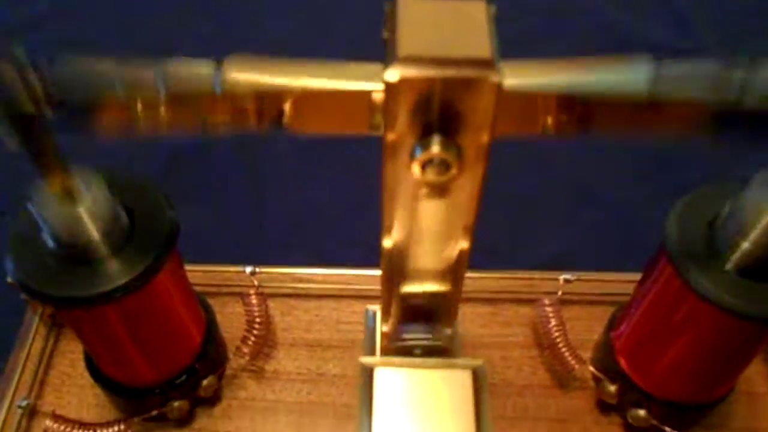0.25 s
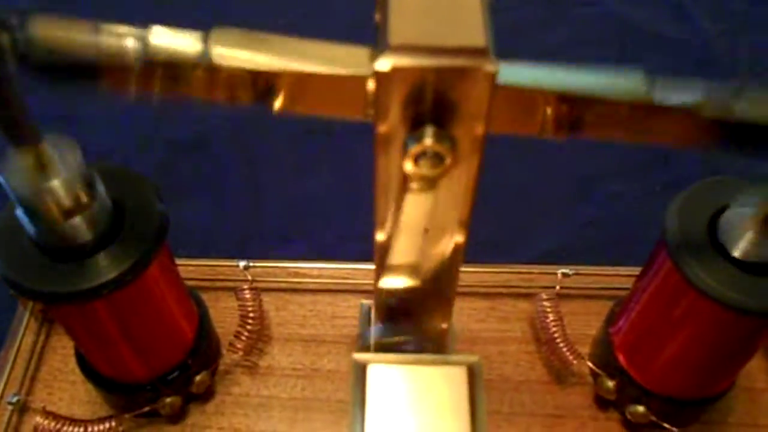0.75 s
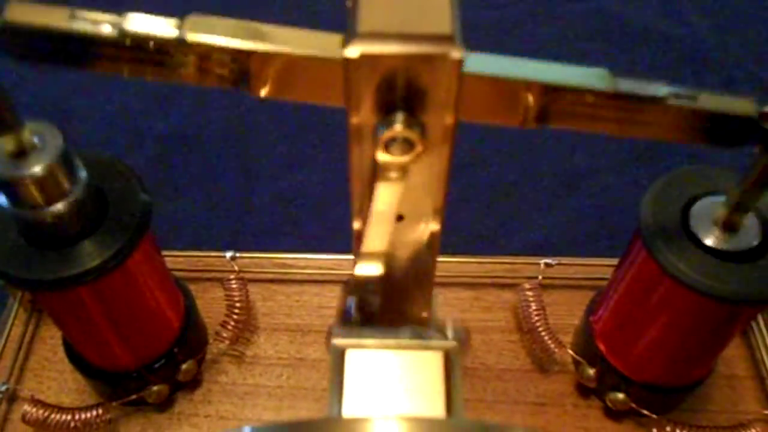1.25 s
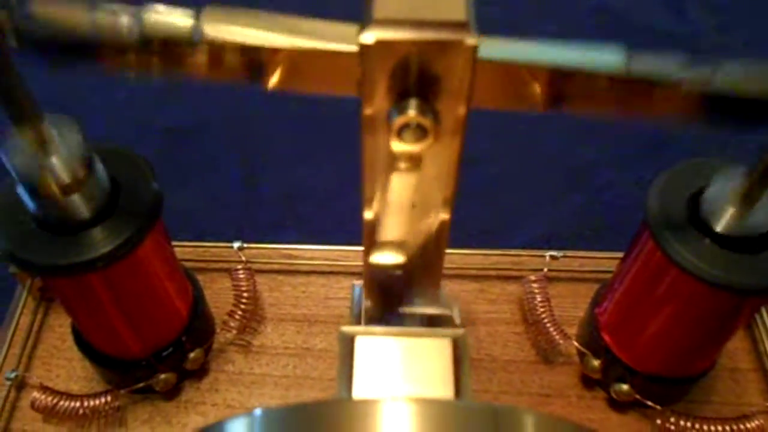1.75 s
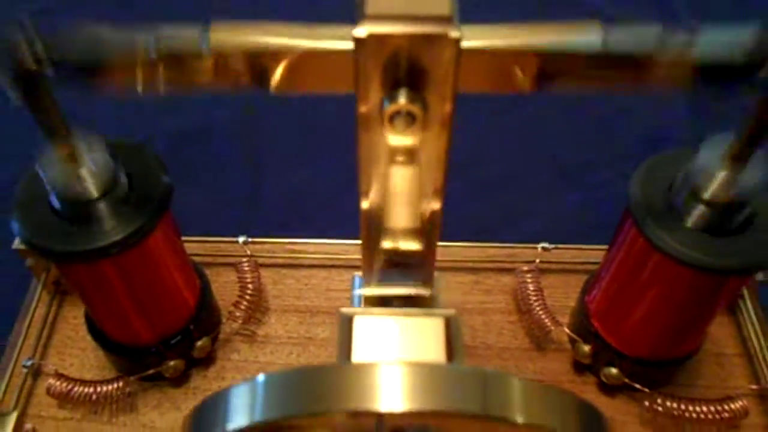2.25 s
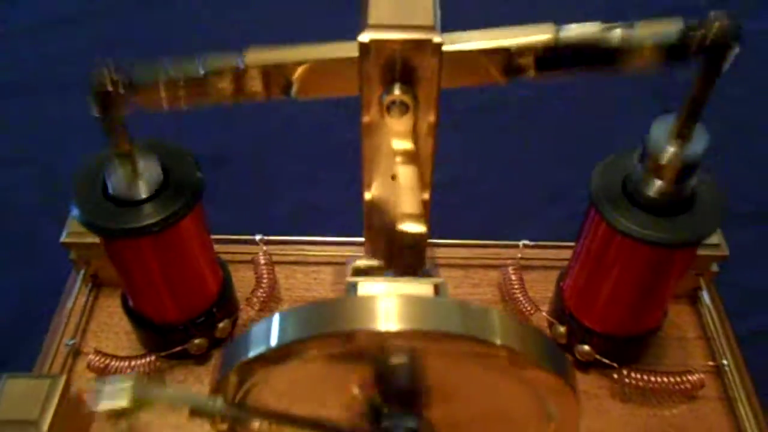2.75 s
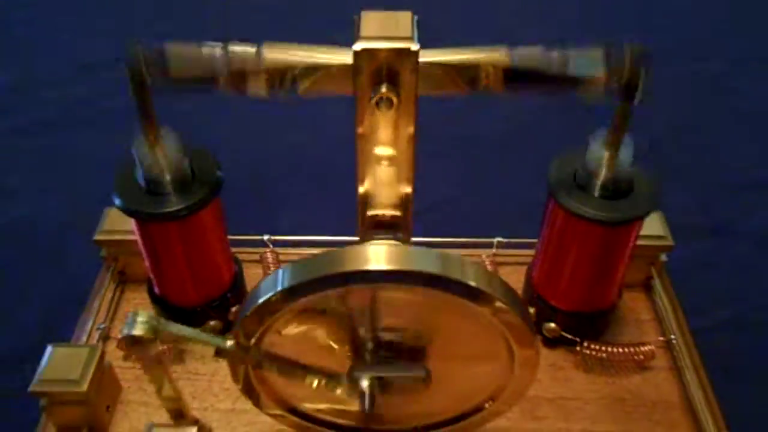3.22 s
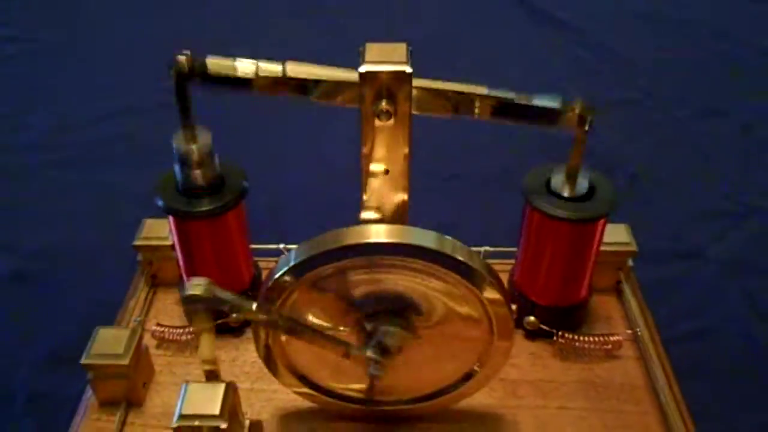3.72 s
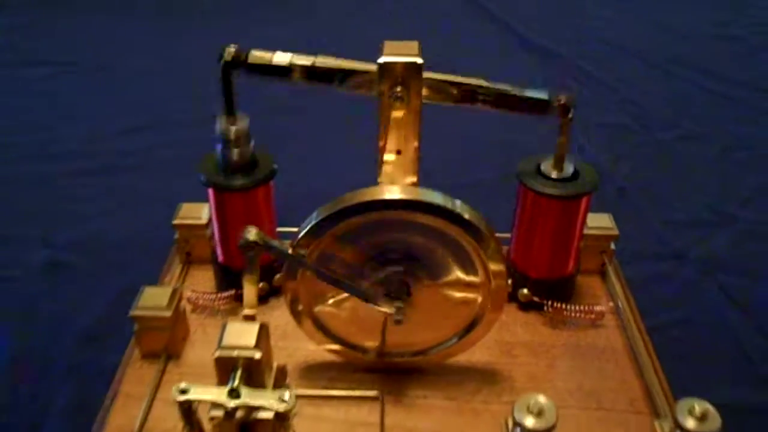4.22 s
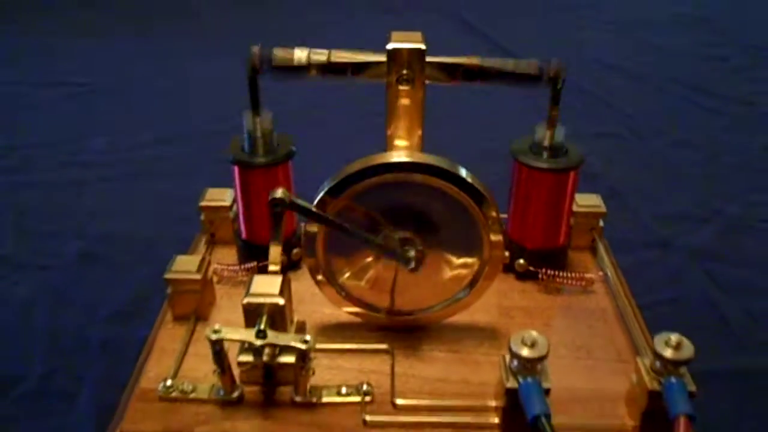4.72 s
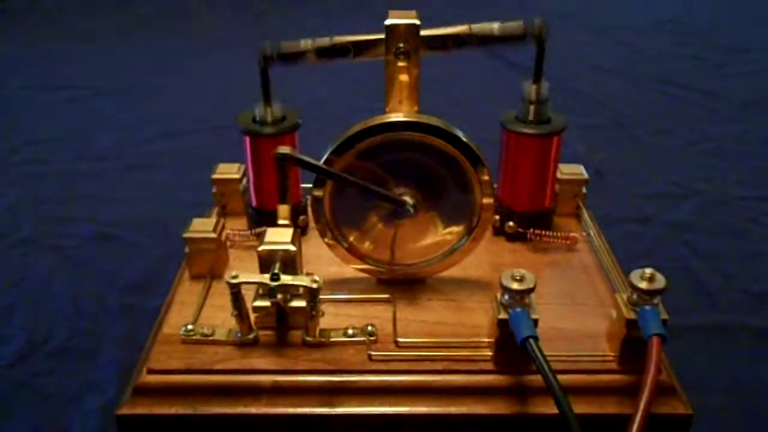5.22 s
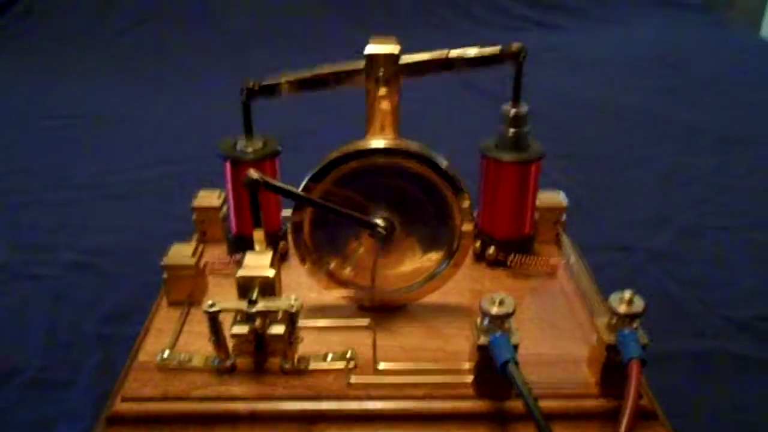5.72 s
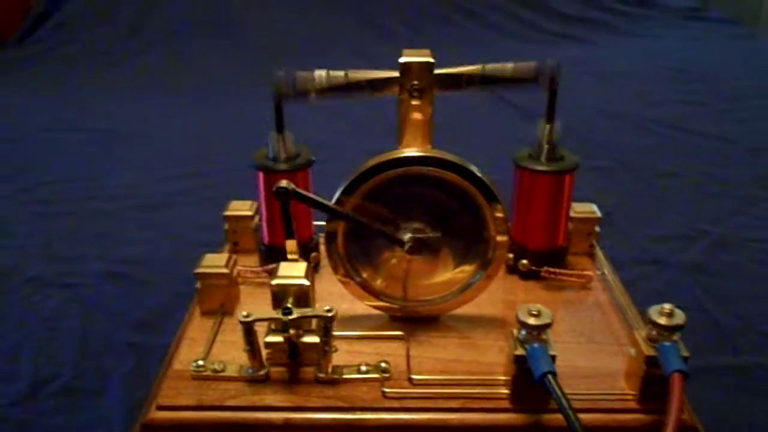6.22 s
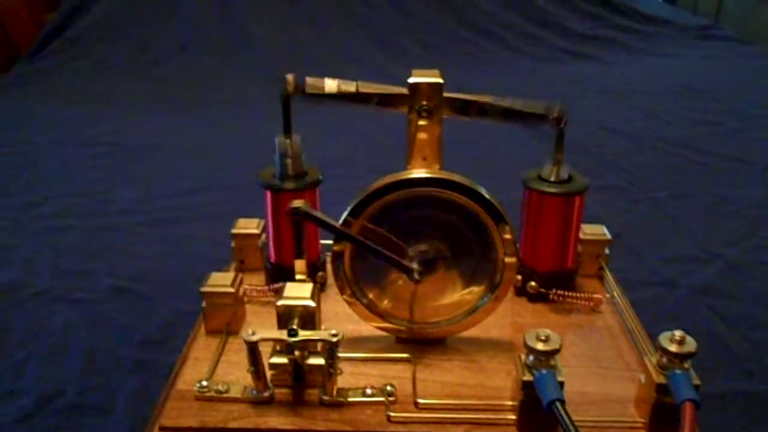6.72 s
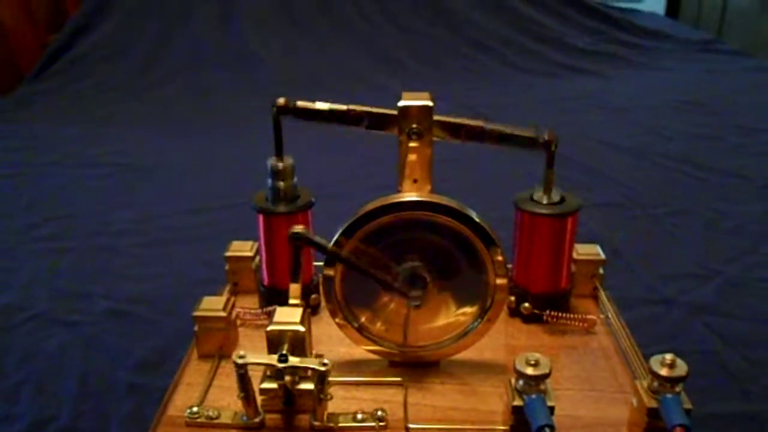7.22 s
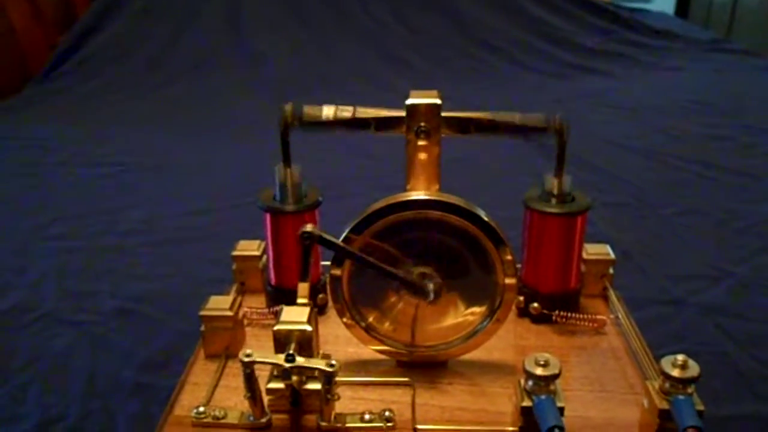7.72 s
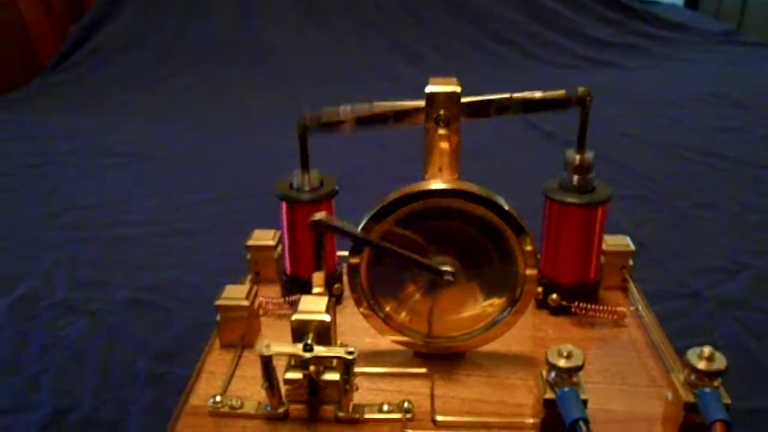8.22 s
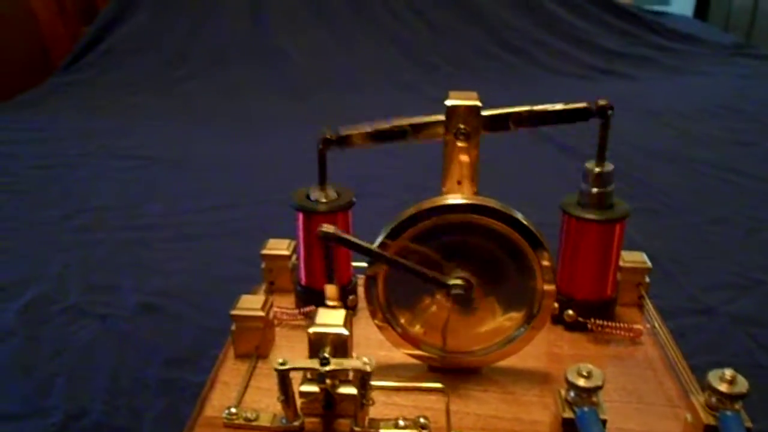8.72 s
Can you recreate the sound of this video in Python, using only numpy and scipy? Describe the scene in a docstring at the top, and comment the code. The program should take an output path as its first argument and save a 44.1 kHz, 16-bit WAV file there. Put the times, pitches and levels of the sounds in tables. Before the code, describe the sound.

Rapid steady metal clatter of a tabletop beam engine on a wooden base, dry knocks and bright contact snaps, gradually heard from farther away.

```python
"""Small, soft room: a brass beam engine with two solenoids clatters at nearly six turns a second on a wooden base.
Each turn has two plunger knocks, a pin tick and two contact snaps: noise bursts with rebounds, filtered by colour.
Between them friction noise scrapes, catches ring resonances, and decaying modes add the brass.
The microphone backs away; two dull thumps, one with a rebound, sound early on wood.
Soft dull swells and short hollow bumps are resonant noise; air noise and a faint mains hum lie beneath."""
import sys
import numpy as np
from scipy import signal
from scipy.fft import rfft, irfft
from scipy.io import wavfile
from scipy.ndimage import uniform_filter1d

SR = 44100
rng = np.random.default_rng(int(sys.argv[2]) if len(sys.argv) > 2 else 0)


def to_wav(sig):
    """Store sig (one row per channel, or 1-D mono) as 16-bit WAV at the path in sys.argv[1].

    Samples outside -1..1 are clipped; the rate is SR.
    """
    pcm = np.clip(np.atleast_2d(sig), -1, 1) * 32767
    pcm = np.round(pcm).astype(np.int16)
    wavfile.write(sys.argv[1], SR, pcm.T)  # frames by channels


N = 394694
TIME = np.arange(N) / SR
SIZE, LEAD = 4096, 256  # length of a blow and its part before the impact, samples
AGE = (np.arange(SIZE) - LEAD) / SR  # time since impact, s
BINS = np.fft.rfftfreq(SIZE, 1 / SR)  # Hz
ONSET_S = .00016  # rise of a hard contact
EDGE_HZ = 12500

# Flywheel slowly losing speed. Each row: time in seconds, length of one turn in seconds.
PERIOD = [(1.7, .1745), (2.8, .17514), (6, .1765), (8.9, .17744)]
# Microphone backing away. Each row: time in seconds, distance from 0 near to 1 far.
DISTANCE = [(0, 0.06), (1.8, 0.0088), (3, 0.26), (4, 0.54), (5, 0.73), (8.9, 0.76)]
# Plunger blows before each blow's own gain. Each row: time in seconds, level in dB.
PLUNGER_DB = [(0, -26.5), (2, -25.5), (5, -28), (8.9, -27.5)]
# Contact snaps before each snap's own gain. Each row: time in seconds, level in dB.
CONTACT_DB = [(0, -28.5), (1.9, -26.5), (2.9, -25), (3.6, -25), (4.198, -27.5), (8.902, -27.5)]
# Plunger friction through one turn. Each row: share of the turn, level in dB.
FRICTION = [(0, -37.5), (.1, -65), (.14, -38.5), (.19, -49.5), (.23, -38.5), (.34, -41), (.44, -40.5),
            (.55, -48.5), (.7, -60), (.735, -45), (.86, -43.5), (.95, -45), (.985, -48), (1, -49)]
# Plunger ring climbing as it slides into its bore. Each row: share of the turn, pitch in Hz.
BORE = [(.14, 3100), (.22, 3620), (.36, 6300), (.45, 7100), (.73, 3900), (.87, 4840)]


def amp(db):
    """Decibels to gain."""
    return 10 ** (np.asarray(db) / 20)


def unit(x):
    """Scales to an rms of one."""
    return x / np.sqrt(np.mean(x ** 2) + 1e-20)


def blow(x, db):
    """Scales a blow so that its energy, spread over 10 ms, has the level db."""
    return amp(db) * x / np.sqrt(np.sum(x ** 2) / (.01 * SR) + 1e-20)


def curve(rows, at):
    """Joins (x, value) rows by straight lines."""
    return np.interp(at, *np.transpose(rows))


def read(rows, hz, order=1):
    """Reads one column of a spectrum on a log-frequency axis."""
    rows = np.asarray(rows, float)
    return np.interp(np.log(hz + 1), np.log(rows[:, 0] + 1), rows[:, order])


def add(mix, s, sound):
    """Mixes in a blow that lands at time s."""
    start = round(s * SR) - LEAD
    sound = sound[max(-start, 0):]
    part = mix[max(start, 0):][:len(sound)]
    part += sound[:len(part)]


def causal(db):
    """Minimum-phase response for a gain in dB on BINS."""
    log_gain = np.log(amp(np.r_[db, db[-2:0:-1]]))
    return np.exp(np.conj(signal.hilbert(log_gain)))[:len(db)]


def colour(x, db):
    """Filters x by a gain in dB on BINS."""
    return signal.oaconvolve(x, irfft(causal(db)))[:len(x)]


def resonate(x, hz, width_hz):
    """Fixed or moving resonance of gain one: shift to zero pitch, smooth, shift back."""
    turn = np.exp(2j * np.pi * np.cumsum(hz * np.ones(len(x))) / SR)
    r = np.exp(-np.pi * width_hz / SR)
    smooth = signal.lfilter([1 - r], [1, -r], x / turn + 1e-18)
    return 2 * (turn * smooth).real


def resonate_twice(x, hz, width_hz):
    """Two equal resonances in series, for steeper skirts."""
    return resonate(resonate(x, hz, width_hz), hz, width_hz)


def ring(x, modes):
    """Passes x through decaying modes, each with its gain at the peak."""
    t = np.arange(SR // 2) / SR
    body = np.zeros(len(t))
    for hz, db, t60_s in modes:
        peak_gain_one = 2 * np.log(1000) / (t60_s * SR)
        body += peak_gain_one * amp(db - 60 * t / t60_s) * np.sin(2 * np.pi * hz * t)
    return signal.oaconvolve(x, body)[:len(x)]


def swell(t, rise_s, decay_s):
    """Exponential rise up to t = 0, exponential fall after it."""
    return np.exp(np.minimum(t, 0) / rise_s - np.maximum(t, 0) / decay_s)


def turns(first_s=-.066, slip_at_s=4.6, slip_s=.0129):
    """Start times of the flywheel's turns, one period apart; once the beat slips and stays late."""
    starts = [first_s]
    while starts[-1] < N / SR:
        starts.append(starts[-1] + curve(PERIOD, starts[-1]))
    starts = np.array(starts)
    return starts + slip_s * (starts > slip_at_s)


def crank():
    """The share of its turn that the flywheel has reached at each moment."""
    starts = turns()
    return np.interp(TIME, starts, np.arange(len(starts))) % 1


# share: place in the turn; lag: added share once the wheel has slowed;
# alike: likeness to the turn before, 0-1; solid: share of clean push, 0-1
def stroke(spectrum, level, share, lag, rise_s, decay_s, bounce_s, bounce_db, tail_db, tail_s,
           alike, gain_db, scatter_db, far_db=0, solid=0, accents=(),
           pitch_scatter_oct=.025, ripple_db=2.3, solid_hz=3000, snap_hz=6700, brighten=.94):
    """One impact a turn: a burst of micro-contacts and a rebound, akin from turn to turn."""
    out, grain = np.zeros(N), rng.standard_normal(SIZE)
    for start in turns()[:-1]:
        period = curve(PERIOD, start)
        slowed = (period - PERIOD[0][1]) / (PERIOD[-1][1] - PERIOD[0][1])
        s = start + (share + lag * slowed) * period
        grain = alike * grain + np.sqrt(1 - alike ** 2) * rng.standard_normal(SIZE)
        late, strong, long, chance, pitch = rng.standard_normal(5)

        rebound_gain = amp(min(bounce_db + 10 * strong, 0))  # never above the blow
        rebound = rebound_gain * swell(AGE - bounce_s * (1 + .19 * late), rise_s, decay_s)
        accent_db = sum(db for at, db in accents if abs(at - s) < period / 2)
        force_db = accent_db or scatter_db * np.tanh(chance)
        force = amp(force_db)
        # a harder blow is over sooner and stands further above its rebound
        main = force * swell(AGE * force, rise_s, decay_s * np.exp(.062 * long))
        burst = rfft(grain * (main + rebound + amp(tail_db) * swell(AGE, rise_s, tail_s)))
        # a brief contact drives all pitches evenly
        burst *= causal(-10 * np.log10(uniform_filter1d(abs(burst) ** 2, size=60)))

        far = curve(DISTANCE, s)
        clean = solid * (1 - far / 3) / (1 + (BINS / solid_hz) ** 6)
        push = rfft(signal.unit_impulse(SIZE, LEAD))
        burst = clean * push + np.sqrt(1 - clean ** 2) * burst

        hz = BINS * 2 ** (pitch_scatter_oct * pitch)  # no two blows land on quite the same spot
        tone_db = (1 - far) * read(spectrum, hz) + far * read(spectrum, hz, order=2)
        # a harder blow gains less in the bass: full effect half an octave below snap_hz
        tone_db += brighten * force_db * np.clip(2 * np.log2((BINS + 1) / snap_hz), -1, 0)
        ripple = np.r_[0, rng.standard_normal(size=12)]
        tone_db += ripple_db * np.interp(BINS, np.linspace(solid_hz, EDGE_HZ, num=13), ripple)
        level_db = curve(level, s) + force_db + gain_db + far * far_db
        add(out, s, blow(irfft(burst * causal(tone_db)), level_db))
    return out


def knock():
    """The plungers reverse: a dry, mostly solid knock."""
    # Each row: pitch in Hz, dB near, dB far.
    knock_tone = [(750, -44, -34), (1120, -10.5, -16), (1540, -23, -58), (1988, -4, 1.5), (2350, -6, -3),
                  (2580, -25, -11.5), (3970, -18, -4), (4630, -29, -1), (5900, -5.5, -11),
                  (9400, -21, -6.5), (11300, -55, -45)]
    return stroke(knock_tone, PLUNGER_DB, share=.003, lag=0, rise_s=ONSET_S, decay_s=.00096,
                  bounce_s=.00194, bounce_db=-16, tail_db=-23, tail_s=.011,
                  alike=.85, gain_db=-1.26, scatter_db=.5, solid=.96)


def clack():
    """The plungers reverse again, with a longer contact."""
    # Each row: pitch in Hz, dB near, dB far.
    clack_tone = [(684, -33, -46), (1290, -18, -32), (1530, -20, -29.5), (2270, -1, -3), (3370, -39, -13),
                  (3930, -21, -1), (5430, -16, -11), (6100, -3, -2), (7770, -14, -6), (10140, -12.5, -11.5),
                  (12750, -48, -34)]
    return stroke(clack_tone, PLUNGER_DB, share=.452, lag=.0037, rise_s=.0002, decay_s=.0031,
                  bounce_s=.0079, bounce_db=-37, tail_db=-23, tail_s=.021,
                  alike=.64, gain_db=0, scatter_db=0, far_db=-.9, solid=.81)


def tick():
    """A pin takes up its play in a very short contact."""
    # Each row: pitch in Hz, dB near, dB far.
    tick_tone = [(755, -23.5, -6), (1310, -13, -9), (2480, -20, -15), (3040, -1.5, 13.5), (3350, -58, -21),
                 (4240, -12, -2), (4700, -30, -48), (6400, -2.5, -2), (8150, -24, -11), (10360, -7.5, -3),
                 (11100, -45, -62)]
    return stroke(tick_tone, PLUNGER_DB, share=.12, lag=.00048, rise_s=.00017, decay_s=.00046,
                  bounce_s=.0019, bounce_db=-27, tail_db=-19, tail_s=.007,
                  alike=.73, gain_db=-9, scatter_db=1, far_db=-3.5)


def contact_make():
    """The contact closes and bounces strongly at once."""
    # Each row: pitch in Hz, dB near, dB far.
    make_tone = [(398, -15, -8), (850, -33, -19), (1470, 7, -1.5), (1853, -33, -53), (1886, 9.5, 5.5),
                 (3770, -37, -12), (4910, 5, 12.5), (5130, -1, -17), (7300, -5, -10), (8440, 5, 10),
                 (10060, 4, 7), (12640, -30, -26)]
    return stroke(make_tone, CONTACT_DB, share=.321, lag=.0044, rise_s=.00075, decay_s=.00062,
                  bounce_s=.0011, bounce_db=-6, tail_db=-10, tail_s=.0019,
                  alike=.43, gain_db=-1.47, scatter_db=1, far_db=-.7)


def contact_break():
    """The contact snaps open with a sharp onset, now and then extra hard."""
    # Each row: pitch in Hz, dB near, dB far.
    break_tone = [(676, -22, -29), (1260, -31, 5), (1600, -14, -14), (1840, 2.5, -5), (2760, -6, 0),
                  (5150, 2, 7), (5150, 6, -18), (6230, 11, 5.5), (8250, 1, 4), (8350, 10, 11.5),
                  (10150, 7.5, 7.5), (13200, -48, -13)]
    # Each row: time in seconds, dB above the usual.
    hard_snaps = [(.26, 9), (.959, 2), (1.134, 2.5), (2.881, 3), (3.757, 2), (6.588, 4.5), (7.65, 2.5)]
    return stroke(break_tone, CONTACT_DB, share=.871, lag=.0066, rise_s=.000089, decay_s=.0021,
                  bounce_s=.00248, bounce_db=-4, tail_db=-24, tail_s=.014,
                  alike=.51, gain_db=.2, scatter_db=.5, far_db=1, accents=hard_snaps)


def chatter(hz=9300, width_hz=1100, level_db=-34.5, length_s=.011, gap_s=.00096):
    """After each knock a light part buzzes against its seat in quick, bright bounces."""
    out = np.zeros(N)
    for s in turns()[:-1]:
        times = np.linspace(2 * gap_s, length_s, num=8) + gap_s * rng.uniform(-.88, .78, size=8)
        bounces = sum(swell(AGE - at, .00013, .0001) * np.exp(-at / length_s) for at in times)
        buzz = bounces * rng.standard_normal(SIZE)
        add(out, s, blow(resonate_twice(buzz, hz, width_hz), level_db))
    return out


def plungers(rough=.24, worn=.25, whistle_db=-9, width_hz=470):
    """The plungers scrape over the same high spots each turn; a faint resonance climbs with the stroke."""
    # Each row: pitch in Hz, dB near, dB far.
    slide_tone = [(420, -8.5, -13.5), (816, -12, -31.5), (1377, 1.5, -16), (1830, 2.5, 1), (1930, -4.5, 5),
                  (3170, -2, -4), (3480, -3, 3), (4120, -5.5, 7), (5540, 4.5, -14), (6600, -15, -6),
                  (9000, -4, -17), (11400, -37, -45)]
    share = crank()
    spots = np.interp(share, np.linspace(0, 1, num=150), rng.standard_normal(size=150))
    stray_grit = unit(uniform_filter1d(rng.standard_normal(N), size=130))
    grit = np.exp(worn * spots + rough * stray_grit)
    rub = unit(grit * rng.standard_normal(N)) * amp(curve(FRICTION, share))
    far = curve(DISTANCE, TIME)
    near_scrape = colour(rub, read(slide_tone, BINS))
    far_scrape = colour(rub, read(slide_tone, BINS, order=2))
    scrape = (1 - far) * near_scrape + far * far_scrape
    whistle = unit(resonate_twice(rub, curve(BORE, share), width_hz)) * (1 - .21 * far)
    return rub.std() * (unit(scrape) + amp(whistle_db) * whistle)


def catches(jitter_s=.0009, scatter_db=3, decay_s=.00097, far_db=-2, rod_hz=2800, rod_db=-2,
            stray_db=-2.5, scatter_oct=.13, width_hz=700):
    """The plungers tick over fixed high spots and stray grit; each tick rings the rod and the bore."""
    # Each row: share of the turn, level in dB before scatter and distance.
    high_spots = [(.246, -43.5), (.303, -40), (.365, -45), (.39, -42), (.42, -61), (.488, -42), (.737, -61)]
    out, age = np.zeros(N), AGE[AGE < .01]
    for start in turns()[:-1]:
        strays = [(share, curve(FRICTION, share) + stray_db) for share in rng.random(size=4) / 2]
        for share, db in list(high_spots) + strays:
            late, strong, rod, bore = rng.standard_normal(size=4)
            s = start + share * curve(PERIOD, start) + jitter_s * late
            burst = rng.standard_normal(len(age)) * swell(age, ONSET_S, decay_s)
            rod_ring = resonate_twice(burst, rod_hz * 2 ** (scatter_oct * rod), width_hz)
            bore_hz = curve(BORE, share) * 2 ** (scatter_oct * bore)
            bore_ring = resonate_twice(burst, bore_hz, width_hz)
            level_db = db + scatter_db * strong + far_db * curve(DISTANCE, s)
            add(out, s, blow(amp(rod_db) * rod_ring + bore_ring, level_db))
    return out


def rattles(width_hz=900, stray_db=-45):
    """Resonant noise clinks of a loose link: a few clear ones and many faint strays."""
    # Each row: time in seconds, level in dB, pitch in Hz.
    clear_clinks = [(0.4345, -31, 4900), (0.4354, -34, 3820), (1.188, -37.5, 3520), (1.882, -38, 3750),
                    (2.762, -40, 3570), (2.933, -39, 3580), (3.277, -39, 3640), (3.451, -29, 3600),
                    (4.851, -33.5, 3720), (5.768, -35, 3500), (5.911, -33, 4070), (6.293, -34.5, 3640),
                    (7.15, -38, 4070)]
    out = np.zeros(N)
    strays = [(when * N / SR, stray_db + 3 * rng.normal(), 3000 * 1.5 ** pitch)
              for when, pitch in rng.random(size=(45, 2))]
    for s, db, hz in list(clear_clinks) + strays:
        burst = rng.standard_normal(SIZE) * swell(AGE, .0002, .0016)
        add(out, s, blow(resonate_twice(burst, hz, width_hz), db))
    return out


def brass(blows, scrape, struck_db=-4, scraped_db=13):
    """Blows ring beam, column and flywheel lightly; the scraping feeds their modes as long as it lasts."""
    # Each row: pitch in Hz, gain in dB, t60 in seconds.
    brass_modes = [(1013, -11.5, .1), (1373, -6, .07), (1412, -7, .07), (1770, -9, .06), (2003, -4, .07),
                   (2743, -2, .05), (2950, -4, .04), (4760, -7, .03)]
    return ring(amp(struck_db) * blows + amp(scraped_db) * scrape, brass_modes)


def passing(x, at_s=4.2, approach_s=2.0, leave_s=.48):
    """The engine's colour shifts as the microphone draws back over the flywheel."""
    # Each row: pitch in Hz, gain in dB.
    over_wheel = [(2000, 0.5), (2850, 4.5), (4500, -.5), (7000, -5), (10500, 2.5)]
    near = swell(TIME - at_s, approach_s, leave_s)
    return (1 - near) * x + near * colour(x, read(over_wheel, BINS))


def whir(level_db=-57, far_db=1):
    """The spinning shaft keeps up a fine whir: steady coloured noise."""
    # Each row: pitch in Hz, level in dB.
    whir_tone = [(1500, -10), (2800, -1.5), (3250, 0.5), (4300, -21), (5500, -4), (7000, -9), (11000, -25)]
    noise = unit(colour(rng.standard_normal(N), read(whir_tone, BINS)))
    return amp(level_db + far_db * curve(DISTANCE, TIME)) * noise


def clunks(decay_s=.0014, soft_db=-48, scatter_db=4.5, far_db=-7, from_share=.67):
    """The crank drops through its play with short, woody clunks; two soft ones come late in every turn."""
    # Each row: time in seconds, level in dB.
    clear_clunks = [(.587, -36.5), (1.14, -37.5), (1.28, -37.5), (1.481, -47), (1.991, -38), (2.174, -40),
                    (2.349, -39.5)]
    # Each row: pitch in Hz, gain in dB, t60 in seconds.
    clunk_modes = [(888, 5, 0.057), (1088, -3, 0.026), (1270, -17, 0.046), (1637, -4.5, 0.023)]
    out, starts = np.zeros(N), np.repeat(turns()[:-1], 2)
    times = starts + curve(PERIOD, starts) * rng.uniform(from_share, 1, len(starts))
    scatter = scatter_db * rng.standard_normal(len(times))
    levels = soft_db + scatter + far_db * curve(DISTANCE, times)
    for s, db in list(clear_clunks) + list(zip(times, levels)):
        push = np.gradient(rng.standard_normal(SIZE) * swell(AGE, ONSET_S, decay_s))
        add(out, s, blow(ring(push, clunk_modes), db))
    return out


def thumps(tail_db=-15, tail_s=.092, wood_db=1, peak_s=.00485):
    """Soft, heavy blows on wood: a rough thud, and a clean push that leaves the boxy modes ringing."""
    # The last is a rebound. Each row: time in seconds, level in dB, muffled above Hz, decay in seconds.
    heavy_blows = [(0.145, -23, 1990, 0.008), (0.216, -26, 1110, 0.011), (0.231, -29, 653, 0.029)]
    # Each row: pitch in Hz, gain in dB, t60 in seconds.
    wood_modes = [(224, 7, .24), (290, 4, .2), (457, 7, .12), (523, 4, .12), (595, 4, .15), (636, 1, .1),
                  (708, 2, .16), (833, -1, .12), (1013, 9, .18), (1070, 3, .14)]
    # Each row: pitch in Hz, level in dB.
    thud_tone = [(150, -19), (230, -5), (600, -2), (1100, 0), (1400, 0), (3000, -8), (8000, -13)]
    out, t = np.zeros(N), (np.arange(SR // 2) - LEAD) / SR - peak_s
    for s, db, muffle_hz, decay_s in heavy_blows:
        treble_loss = (BINS / muffle_hz) ** 4
        bass_loss = muffle_hz / 5 / (BINS + 1) + (190 / (BINS + 1)) ** 6
        soft_db = -10 * np.log10(1 + treble_loss + bass_loss)
        shape = swell(t, .0073, decay_s) + amp(tail_db) * swell(t, .002, tail_s)
        crush = rng.standard_normal(len(t)) * shape
        thud = colour(crush, read(thud_tone, BINS) + soft_db)
        wood = ring(colour(swell(t, ONSET_S / 2, ONSET_S / 2), soft_db), wood_modes)
        add(out, s, blow(thud, db) + blow(wood, db + wood_db))
    return out


def room(x):
    """A small soft room: sparse reflections whose treble dies first."""
    # Each row: pitch in Hz, t60 in seconds.
    room_t60 = [(200, 0.21), (2000, 0.63), (5000, 0.24), (11000, 0.12)]
    taps = rng.standard_normal(SR // 2) * (rng.random(SR // 2) < .08)
    taps[:LEAD] = 0
    hz, t, z = signal.stft(taps, SR, nperseg=256)
    decay_db = -60 * t / read(room_t60, hz)[:, None]
    tail = signal.istft(z * amp(decay_db), SR, nperseg=256)[1]
    return signal.oaconvolve(x, tail / np.linalg.norm(tail))[:N]


def bumps(decay_s=.0019, rough=.46):
    """Short, dry pushes on the microphone's housing, each sounding one hollow resonance."""
    # Each row: time in seconds, level in dB, pitch in Hz, width in Hz.
    housing_bumps = [(2.415, -38, 400, 298), (8.217, -41, 423, 600), (8.257, -45, 330, 400),
                     (8.323, -43, 300, 380), (8.594, -35.5, 392, 320), (8.63, -37.5, 420, 280),
                     (8.83, -39, 406, 41.5)]
    out, shape = np.zeros(N), swell(AGE, ONSET_S, decay_s)
    for s, db, hz, width_hz in housing_bumps:
        push = rough * rng.standard_normal(SIZE) * shape
        push[LEAD] += np.linalg.norm(shape)
        add(out, s, blow(resonate_twice(push, hz, width_hz), db))
    return out


def dull_swells(width_hz=430, rough=.2):
    """Soft, dull swells of uneven resonant noise."""
    # Each row: middle in seconds, level at the middle in dB, half length in seconds, pitch in Hz.
    swell_rows = [(2.2, -57.5, 1.1, 420), (4.38, -54.5, 0.36, 444), (6.656, -52.5, 0.2, 495),
                  (8.567, -45.5, 0.14, 412)]
    out = np.zeros(N)
    unevenness = unit(uniform_filter1d(rng.standard_normal(N), size=900))
    noise = rng.standard_normal(N) * np.exp(rough * unevenness)
    for s, db, length_s, hz in swell_rows:
        envelope = np.exp(-((TIME - s) / length_s) ** 2 / 2)
        out += amp(db) * envelope * unit(resonate_twice(noise, hz, width_hz))
    return out


def brushing(hiss_db=-42):
    """Coloured noise: a brushing hiss under the first thumps, soon faded out."""
    tone = [(150, 3.0), (400, 13.0), (800, 5.0), (6500, 5), (11000, -12.5)]  # Hz, dB
    hiss = unit(colour(rng.standard_normal(N), read(tone, BINS)))
    return amp(hiss_db) * curve([(.12, 1), (.25, .29), (.34, 0)], TIME) * hiss


def background(air_db=-50, hum_hz=120):
    """Room air as coloured noise, and a mains hum sine whose level slowly wanders."""
    # Each row: pitch in Hz, level in dB.
    air_tone = [(20, -5.5), (50, -4.5), (95, -13), (160, -8.5), (280, -9), (650, -19.5), (1500, -11.5),
                (4000, -40.5), (10000, -21.5), (12500, -53)]
    air = amp(air_db) * unit(colour(rng.standard_normal(N), read(air_tone, BINS)))
    hum_db = curve([(0, -62), (3, -62.5), (5, -59.5), (7.8, -58), (8.9, -62.5)], TIME)
    return air + amp(hum_db) * unit(np.sin(2 * np.pi * hum_hz * TIME))


def scene(room_db=-24.5):
    """Engine and thumps sound in the room; hiss, swells, bumps, air and hum are added without it."""
    impacts = knock() + tick() + contact_make() + clack() + contact_break()
    blows = impacts + chatter() + rattles() + catches()
    scrape = plungers()
    engine = passing(blows + scrape + brass(blows, scrape))
    direct = engine + whir() + clunks() + thumps()
    close = brushing() + dull_swells() + bumps()
    return (direct + amp(room_db) * room(direct) + close + background())[None]


def record(dry):
    """The recorder's band limit: a linear-phase low-pass."""
    low_pass = signal.firwin(161, EDGE_HZ, window=("kaiser", 8), fs=SR)
    return signal.oaconvolve(dry, low_pass[None], "same")


dry = scene()
out = record(dry)
to_wav(out)
```